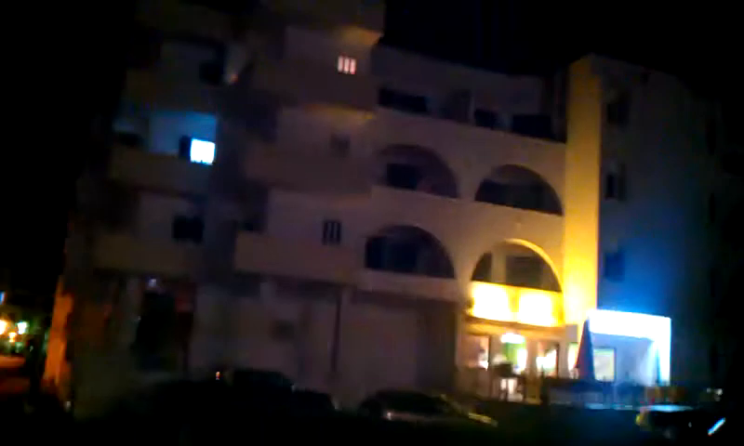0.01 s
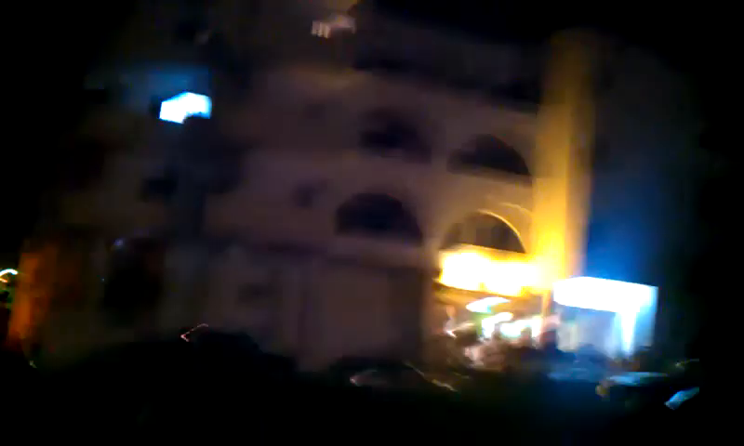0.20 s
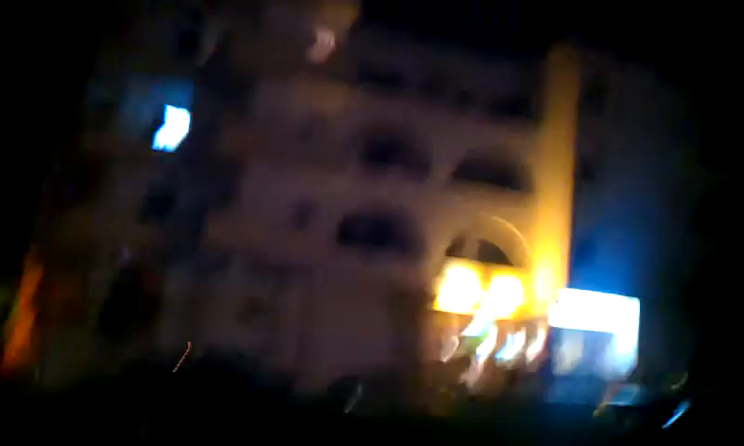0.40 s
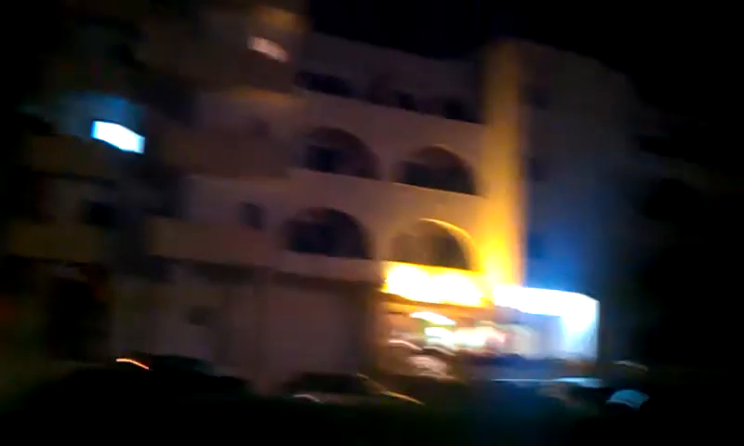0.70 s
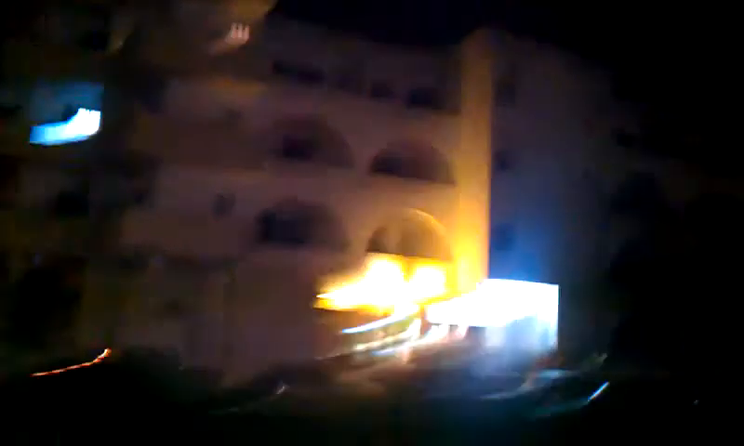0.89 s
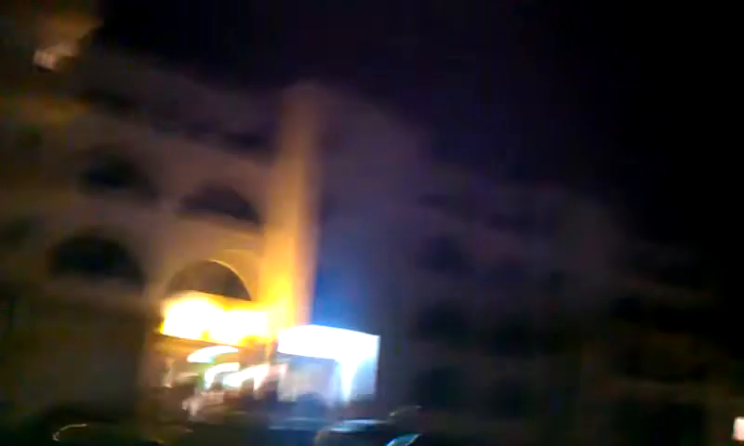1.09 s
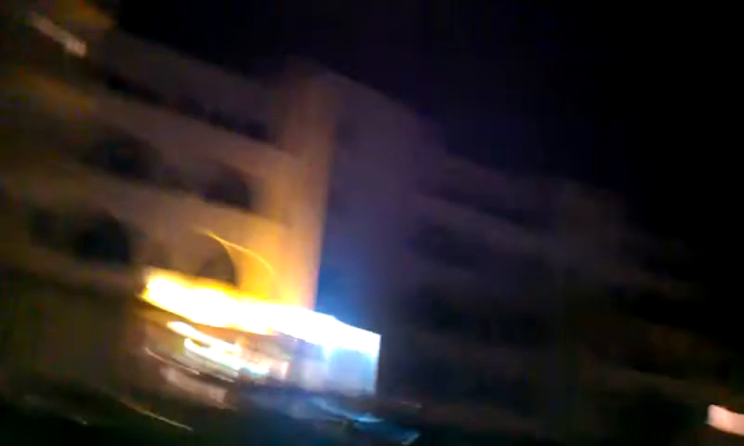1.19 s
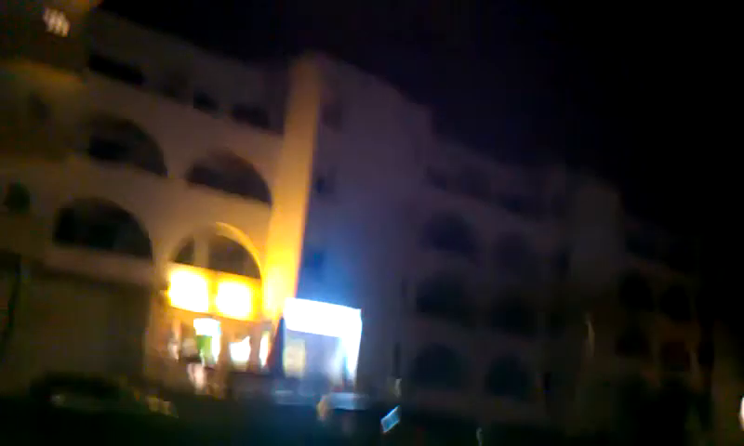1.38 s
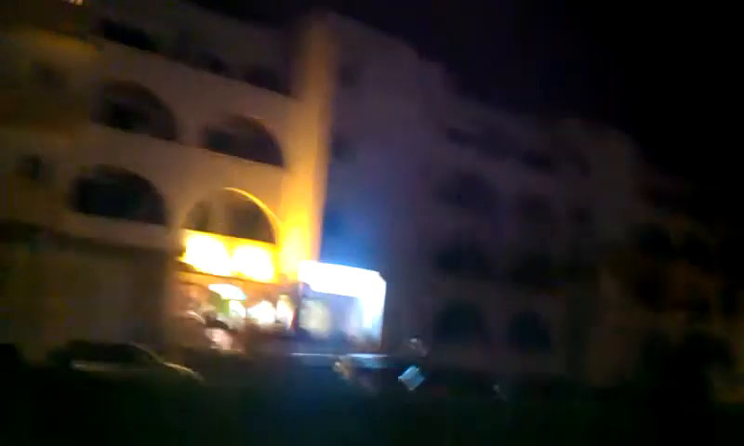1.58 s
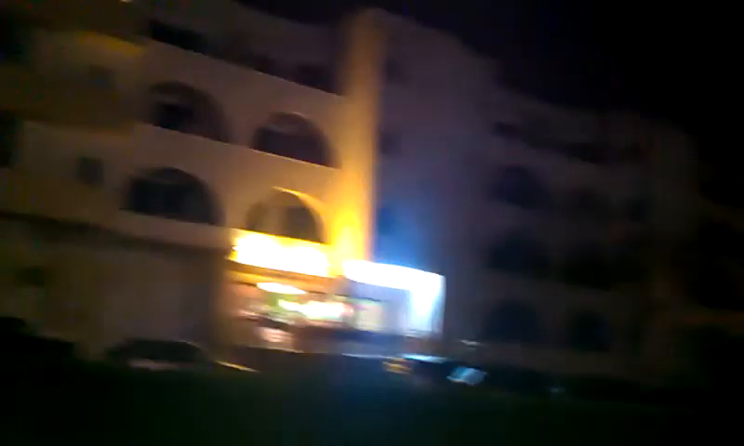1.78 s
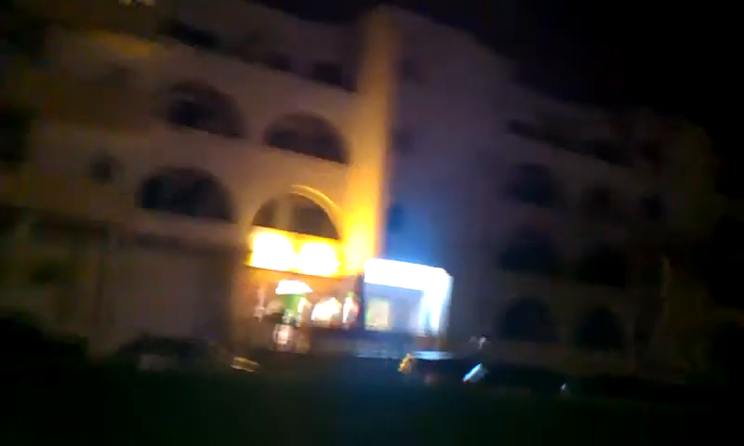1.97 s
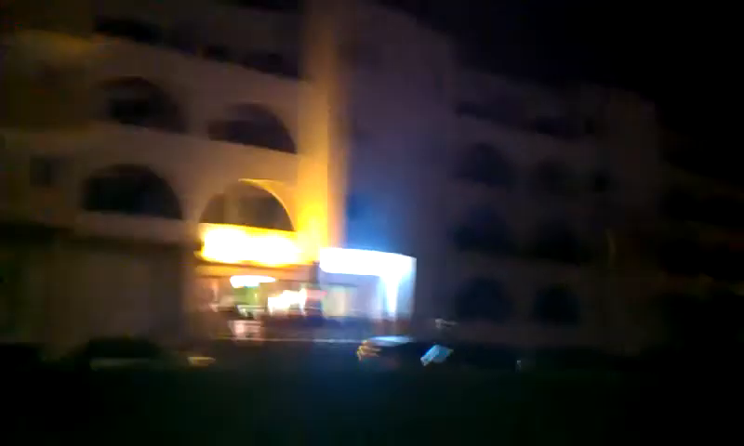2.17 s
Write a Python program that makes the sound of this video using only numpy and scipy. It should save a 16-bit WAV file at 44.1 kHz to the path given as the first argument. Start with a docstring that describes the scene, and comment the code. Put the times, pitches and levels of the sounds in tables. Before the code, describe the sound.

A cricket trills fast and steadily on a night street, lightly echoed by buildings, over distant town murmur and hiss; one sharp click early, then a cluster of ticks and rubs near the end from the handheld microphone.

```python
"""A quiet street at night: a cricket trills, each wing stroke a short falling tone echoed by house fronts.
Fingers shift on the hand-held recorder: ringing ticks of the casing, soft knocks and brief scratchy rubs.
A soft midrange rush dies away at the start. Under it all lie filtered noises: the murmur of the distant
town and a bright hiss, which holds a weak second resonance of the cricket's wings. The sound is mono."""
import sys
import numpy as np
from scipy import signal
from scipy.fft import rfft, irfft
from scipy.io import wavfile
from scipy.ndimage import uniform_filter1d

SR = 44100
rng = np.random.default_rng(int(sys.argv[2]) if len(sys.argv) > 2 else 0)


def put_to_file(sound):
    """Save the sound as 16-bit audio at rate SR, in the file named by the first command-line argument."""
    columns = np.atleast_2d(sound).T  # one column per channel
    safe = np.clip(columns, -1, 1)
    whole_steps = np.round(safe * 32767)
    wavfile.write(sys.argv[1], SR, whole_steps.astype(np.int16))


N = 97020  # 2.2 s

# spectrum of skin dragging over the casing: f/Hz, relative level per Hz/dB
SKIN_COLOUR = [(200, -11), (500, -14), (1200, -2.5), (2500, -5), (4500, -1.5), (6500, -2.5), (8100, 6),
               (10000, -9.5), (12500, -11.5), (15500, -22)]


def undb(db):
    """Decibels to gain."""
    return 10 ** (np.asarray(db) / 20)


def unit(x):
    """Scale to an rms of 1."""
    return x / np.sqrt(np.mean(x ** 2) + 1e-30)


def clock():
    """Time of every sample in seconds."""
    return np.arange(N) / SR


def noise():
    """White noise as long as the scene."""
    return rng.standard_normal(N)


def follow(t, points):
    """Read a curve of (time, value) points at the times t."""
    return np.interp(t, *np.array(points).T)


def colour(x, points):
    """Shape a spectrum by (Hz, dB) points joined along log frequency; rms 1."""
    hz, db = np.array(points, float).T
    f = np.maximum(np.fft.rfftfreq(N, 1 / SR), 1)
    gain = undb(np.interp(np.log(f), np.log(hz), db))
    return unit(irfft(rfft(x) * gain, N))


def lowpass(x, hz, order):
    """Butterworth low-pass."""
    return signal.sosfilt(signal.butter(order, hz, fs=SR, output="sos"), x)


def walk(rate):
    """A smooth random drift with an rms of 1, drawn anew `rate` times per second."""
    hold = max(int(SR / rate), 1)
    steps = np.repeat(rng.standard_normal(N // hold + 1), hold)
    return unit(uniform_filter1d(steps, hold)[:N])


def gate(age, length, attack, release):
    """Rounded attack, hold and release, all in seconds."""
    rise = np.sin(np.pi / 2 * np.clip(age / attack, 0, 1))
    fall = np.sin(np.pi / 2 * np.clip((length - age) / release, 0, 1))
    return rise * fall


def ring(hz, t60):
    """One struck mode: a sine that rises over the time of contact and decays by 60 dB in t60."""
    contact_s = .00005
    t = clock()[:SR // 5]
    decay = np.exp(-np.log(1000) * t / t60)
    return np.sin(2 * np.pi * hz * t) * decay * (1 - np.exp(-t / contact_s))


def modes(table, tuning=1):
    """The ring of a struck object as a sum of its modes, with a peak of 1."""
    out = sum(undb(db) * ring(hz * tuning, t60) for hz, db, t60 in table)
    return out / np.abs(out).max()


def add(out, start, sound):
    """Mix a sound in at a given time in seconds."""
    i = int(np.clip(round(start * SR), 0, N - 1))
    out[i:i + len(sound)] += sound[:N - i]


def street_echo(song):
    """House fronts scatter the song back as a decaying dense echo; its tail wraps round to the start."""
    t60_s, delay_s = 0.22, .011
    t = clock()
    fronts = noise() * np.exp(-np.log(1000) * t / t60_s) * (t > delay_s)
    return unit(irfft(rfft(song) * rfft(fronts), N))


def cricket():
    """Each closing of the wings rings them with a falling, slightly raspy tone; the street answers."""
    # pace of the wings: t/s, strokes per second
    stroke_rate = [(0, 41.65), (.58, 41.65), (.72, 42.4), (1.12, 42.4), (1.3, 42.0), (2.2, 42.02)]
    # loudness of the trill ahead of its echo: t/s, level/dB
    trill_level = [(0.0, -57.5), (0.06, -55), (0.29, -51), (0.31, -53), (0.57, -55), (0.72, -51.5),
                   (0.75, -57), (1.27, -52.5), (1.32, -55.5), (1.42, -51), (1.62, -55), (1.76, -52),
                   (1.79, -55), (1.86, -49.5), (1.94, -55), (2.06, -50), (2.09, -54.5), (2.2, -51.5)]
    first_stroke_s = 0.0019  # middle of the first stroke
    stroke_s, attack_s, release_s = .0138, .007, .006
    wing_hz, sag_hz_per_s = 3194.5, 5200  # pitch at mid-stroke and its fall
    pitch_scatter_hz, time_scatter_s, stroke_scatter_db = 9.95, 0.00041, 0.03
    drift_hz, drift_per_s = 11.71, 9  # the pitch wanders a little
    rasp, rasp_width_hz = 0.0445, 320  # rms of each of the two rasp parts
    echo_db = -9.5

    t = clock()
    rate = follow(t, stroke_rate)
    strokes = np.cumsum(rate) / SR - first_stroke_s * stroke_rate[0][1]
    which = np.maximum(np.round(strokes), 0).astype(int)
    late, sharp, loud = rng.standard_normal(size=(128, 3))[which].T
    age = (strokes - which) / rate - time_scatter_s * late  # seconds from mid-stroke

    hz = wing_hz - sag_hz_per_s * age + pitch_scatter_hz * sharp + drift_hz * walk(drift_per_s)
    carrier = np.exp(2j * np.pi * np.cumsum(hz) / SR)
    # slow complex noise roughens both level and phase
    in_phase = unit(lowpass(noise(), rasp_width_hz, order=3))
    quadrature = unit(lowpass(noise(), rasp_width_hz, order=3))
    tone = np.imag(carrier * (1 + rasp * (in_phase + 1j * quadrature)))

    strokes_gate = gate(age + stroke_s / 2, stroke_s, attack_s, release_s)
    song = unit(tone * strokes_gate * undb(stroke_scatter_db * loud))
    return (song + undb(echo_db) * street_echo(song)) * undb(follow(t, trill_level))


def ticks():
    """The casing snaps with a very short bright ring over its hollow body; skin slips around each snap."""
    # ticks: t/s, peak level of the snap/dB, pitch of the snap f/Hz, level of the body re snap/dB
    tick_list = [(.0076, -25.5, 7850, -32), (0.0134, -28.5, 7300, -19), (0.0493, -34.5, 7960, -28),
                 (.2021, -31, 8600, -26), (0.2251, -16.5, 7940, -10.5), (0.2445, -3, 7600, -28.5),
                 (0.8508, -37.5, 7400, -28), (0.8958, -42, 7400, 11), (0.923, -33, 7200, -26),
                 (1.1593, -30.5, 8300, -28), (1.3058, -33, 8200, -31), (1.3148, -27, 6900, -12.5),
                 (1.3560, -36.5, 8400, -4), (1.4236, -31.5, 6660, -17), (1.4518, -38, 8900, -34),
                 (1.818, -37, 7500, -3), (1.8197, -41, 7200, -24), (1.8209, -27, 7200, -7.5),
                 (1.8298, -33, 7100, -7), (1.8525, -23, 8000, -13), (1.8594, -30, 8200, -20),
                 (1.875, -21.5, 6800, -14), (1.8801, -23, 7200, -11), (1.881, -22, 7200, -35),
                 (1.8858, -30, 7300, -26), (1.9052, -39, 7900, -26), (1.9103, -36, 7600, -19),
                 (1.937, -31, 7500, -28), (1.9425, -23.5, 7700, -27), (2.0022, -36.5, 8100, -37),
                 (2.0177, -36, 8260, -34), (2.0520, -29.5, 7350, -12)]
    # ring of the casing at its listed pitch: f/Hz, relative level/dB, t60/s
    case_modes = [(5300, -12, 0.0025), (7460, 9, 0.0011), (8070, 15, 0.0017), (9500, -24, 0.0014),
                  (11700, -12, 0.0016)]
    case_hz = 7710  # tick pitch at which the casing rings as listed
    # ring of the hollow body: f/Hz, relative level/dB, t60/s
    body_modes = [(730, -8.5, 0.025), (946, 3, .011), (1510, 0, .005), (2100, -4, 0.0056),
                  (4060, -10, 0.0021)]
    snap_band_hz = [4100, 14000]
    slip_db, slip_growth, slip_s = -31.5, 0.35, 0.0018  # growth: dB more per dB of tick

    t, out, slip = clock(), np.zeros(N), np.zeros(N)
    band = signal.butter(2, snap_band_hz, "band", fs=SR, output="sos")
    skin = colour(noise(), SKIN_COLOUR)
    body = modes(body_modes)
    for start, db, hz, body_db in tick_list:
        snap = signal.sosfilt(band, modes(case_modes, hz / case_hz))
        snap /= np.abs(snap).max()
        add(out, start, undb(db) * (snap + undb(body_db) * body))
        # the slip swells before the snap and dies away after it
        slip += undb(slip_db + slip_growth * db) * np.exp(-np.abs(t - start) / slip_s)
    return out + slip * skin


def knocks():
    """A fingertip bumps the recorder: one dull, damped ring each."""
    # knocks: t/s, level ahead of the damping/dB, f/Hz, t60/s
    knock_list = [(0.2244, -46, 110, 0.04), (0.2459, -46, 170, 0.026), (.42, -47, 70, 0.11),
                  (1.7977, -30, 640, 0.0081)]
    out = np.zeros(N)
    for start, db, hz, t60 in knock_list:
        add(out, start, undb(db) * ring(hz, t60))
    return out


def rubs():
    """Skin drags over the casing in dense, uneven grains."""
    # rubs: start t/s, length/s, level/dB
    rub_list = [(0, 0.063, -55), (0.215, 0.023, -47), (1.256, 0.019, -51.5), (1.805, 0.035, -46),
                (1.845, 0.073, -49), (1.941, 0.014, -51), (2.004, 0.071, -56)]
    grain_db, grains_per_s, edge_s = 3, 900, .003
    t, level = clock(), np.zeros(N)
    grains = colour(noise() * undb(grain_db * walk(grains_per_s)), SKIN_COLOUR)
    for start, length, db in rub_list:
        level += undb(db) * gate(t - start, length, edge_s, edge_s)
    return grains * level


def rush():
    """A soft midrange rush of coloured noise fades and stops."""
    # spectrum of the rush: f/Hz, relative level per Hz/dB
    rush_colour = [(300, -15), (620, -4), (900, -6), (1250, 3), (1600, -4), (2100, -4.5), (3000, -23),
                   (6000, -50)]
    start_db, fade_db_per_s, end_s, release_s = -51.5, 15, 0.402, 0.074
    t = clock()
    fade = undb(start_db - fade_db_per_s * t) * np.clip((end_s - t) / release_s, 0, 1)
    return fade * colour(noise(), rush_colour)


def town():
    """The distant town is a low wash of noise with its top cut off, barely wavering."""
    # spectrum of the town ahead of the cut: f/Hz, relative level per Hz/dB
    town_colour = [(15, -27), (25, -22), (59, -0.5), (97, -6), (143, -4), (289, -1), (373, -9.5), (404, -4),
                   (428, -6.5), (741, -8), (833, -9), (2130, -12), (2700, -14), (3510, -81), (5940, -120)]
    level_db, waver_db, edge_hz = -54, .5, 2760
    wash = unit(lowpass(colour(noise(), town_colour), edge_hz, order=6))
    return wash * undb(level_db + waver_db * walk(8.1))


def bright_hiss():
    """A steady bright hiss, with a weak second resonance of the cricket's wings near 3.5 kHz, barely wavering."""
    # spectrum of the hiss and the wing resonance: f/Hz, relative level per Hz/dB
    hiss_colour = [(2000, -40), (2900, -3), (3300, 3), (3570, 3.5), (3900, -4.5), (4250, 0.5), (5200, -1.5),
                   (6300, -3), (7900, 1), (9200, -3.5), (10500, -10), (12000, -14), (15500, -16)]
    level_db, waver_db = -52.5, .5
    return colour(noise(), hiss_colour) * undb(level_db + waver_db * walk(8))


def scene():
    """Everything reaches one microphone; both channels are alike."""
    mono = cricket() + ticks() + knocks() + rubs() + rush() + town() + bright_hiss()
    return np.array([mono, mono])


def record(dry):
    """The recorder cuts the top steeply."""
    top_hz = 15900
    # 0.2 dB ripple below the edge, 70 dB down above it
    return signal.sosfilt(signal.ellip(8, .2, 70, top_hz, fs=SR, output="sos"), dry)


dry = scene()
out = record(dry)
put_to_file(out)
```